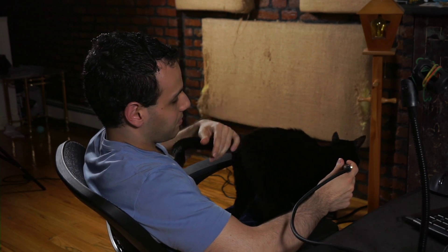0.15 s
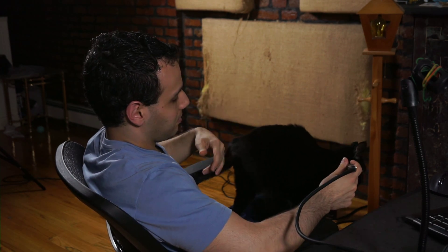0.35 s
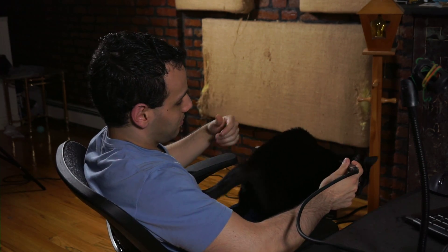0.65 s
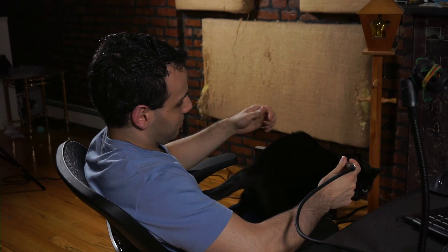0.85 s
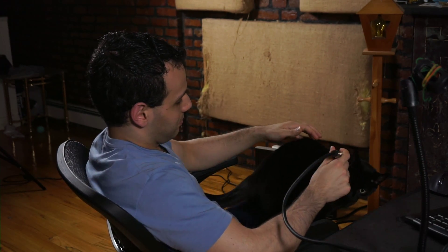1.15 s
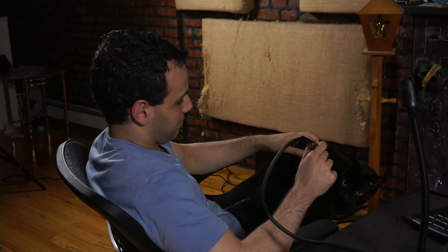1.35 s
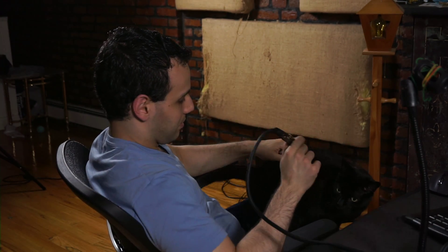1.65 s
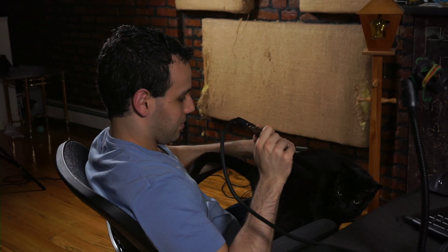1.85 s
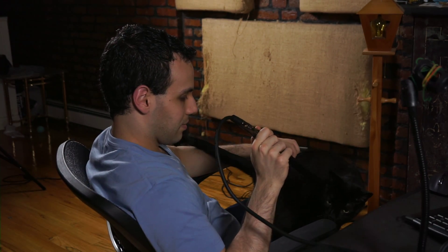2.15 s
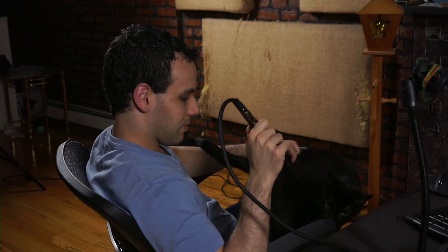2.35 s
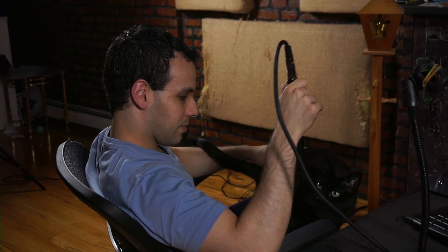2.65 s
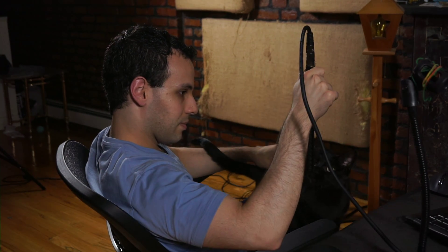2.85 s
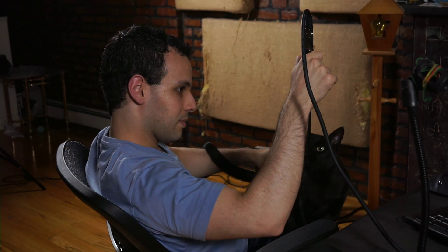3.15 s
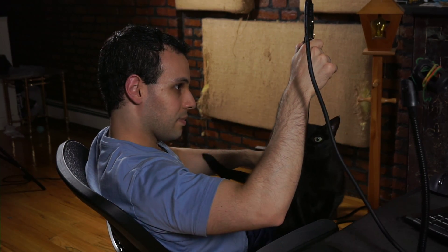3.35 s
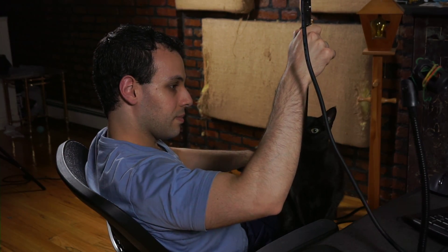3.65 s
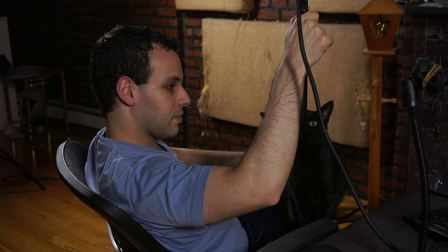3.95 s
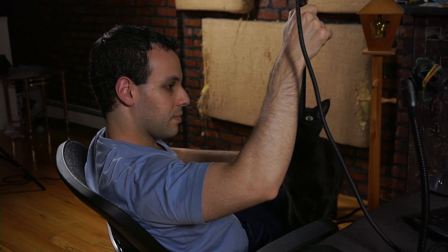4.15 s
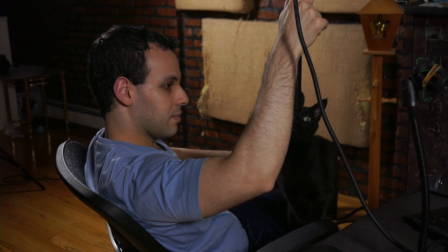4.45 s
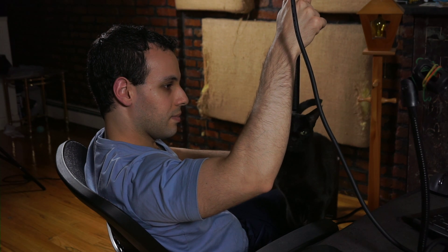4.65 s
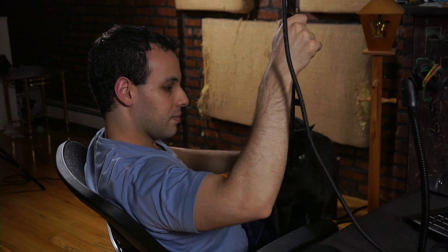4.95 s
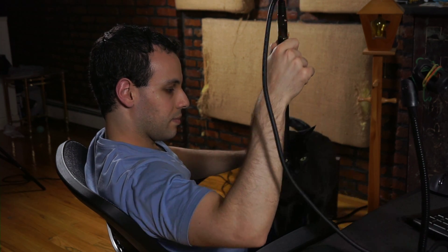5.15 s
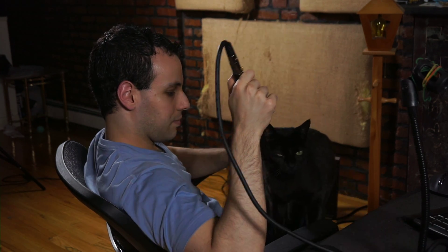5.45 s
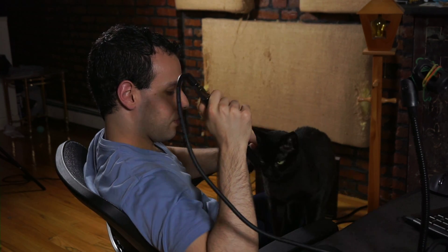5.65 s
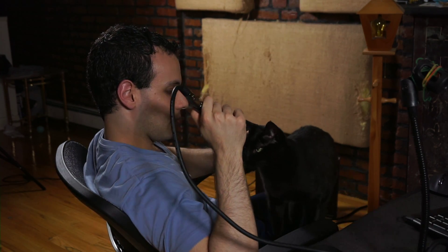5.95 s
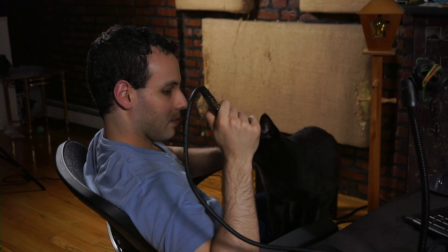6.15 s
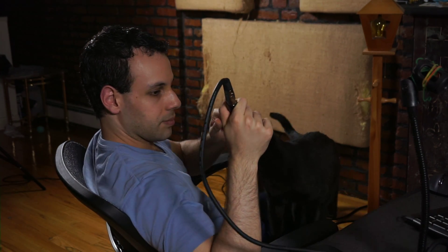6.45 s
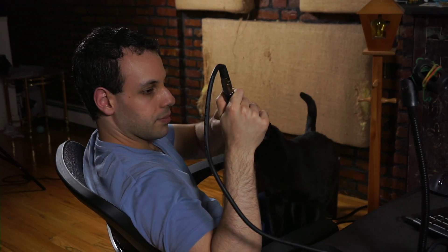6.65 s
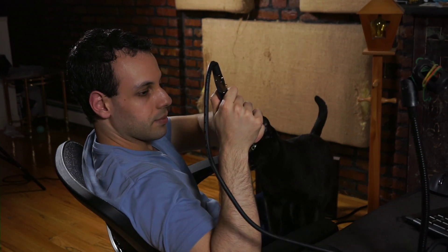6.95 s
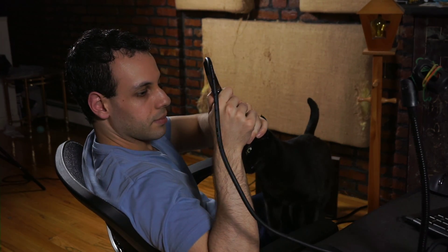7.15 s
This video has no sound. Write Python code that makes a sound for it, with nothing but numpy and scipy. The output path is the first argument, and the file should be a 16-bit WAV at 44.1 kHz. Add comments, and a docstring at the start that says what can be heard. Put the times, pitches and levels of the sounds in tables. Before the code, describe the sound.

Low, pulsing cat purring swells and fades right at the microphone, joined by soft knocks, fur rubs and brief wet squeaks.

```python
"""A cat purrs a few centimetres from a handheld microphone in a quiet room.
Its larynx is a pulse source, about 25 cycles a second, filtered by chest, throat and nose:
round on the way out, faster and with a rasp on the way in. Air forced through a tiny wet gap gives
three short kiss-like squeaks. Fur excites the grille by friction, and knocks rock the capsule;
behind it all lies the low rumble of the room."""
import sys
import numpy as np
from scipy import signal
from scipy.fft import rfft, irfft, next_fast_len
from scipy.io import wavfile

SR = 44100
rng = np.random.default_rng(int(sys.argv[2]) if len(sys.argv) > 2 else 0)


def store_pcm(level_fs):
    """Save levels as 16-bit WAV."""
    pcm = np.round(np.clip(level_fs, -1, 1) * 32767).astype(np.int16)
    wavfile.write(sys.argv[1], SR, np.atleast_2d(pcm).T)


N = 322004
TIME = np.arange(N) / SR
BAND_LIMIT_HZ = 15900

# Outward strokes: first pulse t/s, last pulse t/s, count, relative level/dB of throat, nose, reopening
EXHALES = [(1.96, 2.41, 12, -72, -66, 4.5), (2.750, 3.235, 13, -60.5, -58.5, 5.5),
           (3.500, 3.831, 9, -78, -71, -1.5), (4.213, 4.545, 9, -82, -87, -1),
           (5.012, 5.459, 12, -95, -94, -12), (5.805, 6.090, 8, -61, -67, 0),
           (6.545, 6.91, 10, -62, -84.5, 3)]
# Inward strokes: first pulse t/s, last pulse t/s, count, relative level/dB of throat, nose
INHALES = [(2.460, 2.691, 7, -56.5, -64), (3.249, 3.438, 6, -46.5, -73), (3.844, 4.150, 9, -49, -75),
           (4.560, 4.866, 9, -66.5, -66.5), (5.49, 5.755, 8, -58.5, -64.5), (6.125, 6.464, 10, -71, -70)]
THROAT, NOSE, REOPENING = 3, 4, 5  # level columns of the strokes
# Spectrum of the microphone housing, also given to the room's tail: f/Hz, level/dB
HOUSING = [(100, 3), (420, 10.5), (680, 2), (1100, 4), (2900, -2.5), (4800, -16.5), (12000, -36.5)]


def thumps():
    """Source and filter: the larynx shuts with a chest thump and reopens with a flap and a low gurgle."""
    nearness = [(1.9, -47.5), (2.5, -44.5), (2.9, -22), (3.4, -13.5), (3.62, -25.5), (4.3, -18.5),
                (4.55, -46), (5.15, -49), (5.98, -17), (6.2, -33.5), (6.5, -44), (6.9, -24)]  # gain as the head nears and turns away: t/s, level/dB
    chest_out = [(22, 7), (45, 3.5), (70, 11.5), (120, 5), (200, -10.5), (380, -20), (480, -30.5),
                 (620, -58.5)]  # chest spectrum, exhaling: f/Hz, level/dB
    chest_in = [(22, 5.5), (48, 2.5), (80, 10.5), (165, -19.5), (380, -24), (560, -55.5)]  # chest spectrum, inhaling: f/Hz, level/dB
    push = breath(EXHALES, start_db=-2.5, end_db=-9)
    pull = breath(INHALES, start_db=-3.5, end_db=1.6)
    shut_out = push * pulses(EXHALES, delay=-0.00616, jitter=0.0006, spread_db=1.6)
    shut_in = pull * pulses(INHALES, delay=-0.0036, jitter=0.00051, spread_db=1.5)
    open_out = push * pulses(EXHALES, delay=0.01076, jitter=0.0011, spread_db=1.5, column=REOPENING)
    open_in = pull * pulses(INHALES, delay=0.02, jitter=0.001, spread_db=3)
    outward = chest_wall(colour(shut_out, chest_out), hz=138) - amp(-14) * build_up(shut_out, 0.014)
    chest = outward + amp(-1.05) * colour(shut_in, chest_in)
    reopening = amp(-14) * open_in - amp(-20.5) * open_out
    flap = colour(reopening, [(60, -30.5), (140, 9.5), (260, -3.5), (480, -29.5)])
    turbulence = puffs(open_out + amp(-1) * shut_in, decay=0.0021)
    gurgle = amp(-20.5) * colour(turbulence, [(110, -3.5), (190, 0.5), (390, -3.5), (520, -20)])
    return curve(nearness) * (flap + gurgle - chest)


def rasp():
    """Pulsed turbulence: wet folds hiss, snap and tick inward, puff outward; the nose hisses in step."""
    throat_spectrum = [(170, -19.5), (440, 10.5), (600, -1), (820, -1), (1000, -5), (1450, -6),
                       (1800, -26.5), (3900, -27.5), (4700, -38.5), (6200, -22.5), (12000, -44.5)]  # throat resonances: f/Hz, level/dB
    nose_spectrum = [(400, -14), (1400, 11), (2600, -14.5), (3900, 2), (4900, -7.5), (6500, 0.5),
                     (8500, -8), (15000, -20.5)]  # nasal resonances: f/Hz, level/dB
    parting = pulses(INHALES, delay=0.0178, jitter=0.0007, spread_db=2.5, column=THROAT)
    snap = pulses(INHALES, delay=0.0203, jitter=0.0003, spread_db=1, column=THROAT)
    closing = pulses(INHALES, delay=-0.0045, jitter=0.001, spread_db=4.5, column=THROAT)
    leaving = pulses(EXHALES, delay=0.006, jitter=0.001, spread_db=2, column=THROAT)
    nose_out = pulses(EXHALES, delay=0.004, jitter=0.001, spread_db=2, column=NOSE)
    nose_in = pulses(INHALES, delay=0.011, jitter=0.001, spread_db=2, column=NOSE)
    inward = amp(5.5) * snap + parting + amp(-0.5) * puffs(parting, decay=0.00095)
    ticks = amp(-6) * closing + amp(-6.5) * puffs(closing, decay=0.00057)
    throat_air = amp(-7) * puffs(closing, decay=0.005) + amp(4.5) * puffs(leaving, decay=0.0048)
    throat = colour(inward + ticks + throat_air, throat_spectrum)
    ringing = amp(-21.5) * mode(snap + amp(-7.5) * closing, hz=3800, t60=0.013)
    nose_air = puffs(nose_out, decay=0.0065) + puffs(nose_in, decay=0.0031)
    return throat + ringing + colour(nose_air, nose_spectrum)


def wheeze():
    """Flow-driven whistle: on one inward stroke the nose gives rising peeps, highest at peak flow."""
    peep_run = (6.168, 6.432, 8, -47)  # nasal peeps: first t/s, last t/s, count, level/dB
    first, last, count, db = peep_run
    peep_s, base_hz = 0.014, 772
    flow_lift, peep_rise = 0.23, 0.46  # shares of the base pitch
    out, u = np.zeros(N), np.linspace(0, 1, int(peep_s * SR))
    for k, s in enumerate(np.linspace(first, last, round(count))):
        flow = np.sin(np.pi * (k + 0.5) / (count + 2))
        hz = base_hz * (1 + flow_lift * flow + peep_rise * (u - 0.5))
        peep = np.sin(np.pi * u) ** 2 * np.sin(2 * np.pi * np.cumsum(hz) / SR)
        add(out, s - peep_s / 2, amp(db + 2 * rng.standard_normal()) * flow ** 0.5 * peep)
    return out


def pulses(strokes, delay, jitter, spread_db, column=None):
    """Laryngeal pulse train with jitter and shimmer; a level column scales it and arches each stroke."""
    train = np.zeros(N)
    for stroke in strokes:
        first, last, count = stroke[0], stroke[1], round(stroke[2])
        unit_power = np.sqrt(SR * (last - first) / (count - 1))
        for k, s in enumerate(np.linspace(first, last, count)):
            late, size = rng.uniform(-1.38, 1, 2)
            arch = np.sin(np.pi * (k + 0.82) / count) ** 0.5
            flow = 1 if column is None else amp(stroke[column]) * arch
            add(train, s + delay + jitter * late, flow * amp([spread_db * size]) * unit_power)
    return train


def puffs(train, decay):
    """Modulated turbulence: each pulse lets through a soft-edged burst of noise."""
    u = np.arange(SR // 20) / SR / decay
    return excite(train, u ** 2 * np.exp(-u)) * rng.standard_normal(N)


def breath(strokes, start_db, end_db):
    """Amplitude envelope: each stroke gathers force, holds it and moves to end_db as the air turns."""
    gather_s, turn_s = 0.16, 0.1
    points = []
    for first, last, *_ in strokes:
        points += [(first, start_db), (first + gather_s, 0), (last - turn_s, 0), (last, end_db)]
    return curve(points)


def chest_wall(x, hz):
    """All-pass dispersion: the soft wall delays tones below hz, which rounds each thump."""
    pole = np.exp(-2 * np.pi * hz / SR)
    return signal.lfilter([-pole, 1], [1, -pole], x)


def build_up(train, length_s):
    """Blocked flow: pressure swells behind the closed larynx just before each thump."""
    swell = np.hanning(int(length_s * SR))
    lead = len(swell) * 3 // 4
    return signal.oaconvolve(train, swell / np.linalg.norm(swell))[lead:][:N]


def squeaks():
    """Self-oscillation of a tiny wet gap: fluttering harmonics sweep through fixed resonances."""
    # One path a squeak, low and loud while the gap is open, high and quiet when tight: t/s, f/Hz, level/dB
    paths = [
        [(5.565, 1236, -48.5), (5.571, 1056, -18.5), (5.577, 827, -13), (5.586, 756, -11), (5.603, 853, -16),
         (5.609, 1143, -16), (5.617, 1200, -23), (5.625, 1260, -50)],
        [(5.674, 1200, -44), (5.679, 1006, -12.5), (5.685, 830, -16.5), (5.692, 763, -12.5),
         (5.701, 818, -14.5), (5.709, 1095, -18.5), (5.717, 1270, -44)],
        [(5.775, 954, -48), (5.781, 885, -18), (5.789, 1040, -35), (5.796, 1065, -28), (5.801, 1060, -41)],
    ]
    # The gaps, the last slack, dull and rough: cutoff f/Hz, air noise level/dB, pitch waver (share)
    gaps = [(15000, -19.5, 0.015), (15130, -16, 0.018), (2730, -6.5, 0.037)]
    resonances = [(760, -1.5), (1600, -1.5), (2000, -4), (2320, 1), (2600, -8.5), (3900, -12.5),
                  (4600, -12), (6500, -26.5), (8500, -37.5), (15000, -37)]  # spectrum shaping each squeak: f/Hz, level/dB
    out, k = np.zeros(N), np.arange(1, 21)[:, None]  # harmonic numbers
    for path, (top_hz, air_db, waver) in zip(paths, gaps):
        s, pitch, db = np.transpose(path)
        t = np.arange(s.min(), s.max(), 1 / SR)
        hz = np.interp(t, s, pitch) * (1 + waver * wander(370)[:len(t)])
        flutter_db = 2.43 * np.resize(wander(61), (len(k), len(t))) * np.log(k)
        weight = amp(level_at(resonances, k * hz) + flutter_db) * (k * hz < BAND_LIMIT_HZ)
        phase = 2 * np.pi * k * np.cumsum(hz) / SR + rng.uniform(0, np.pi, k.shape)
        tone = (weight * np.cos(phase)).sum(0) / np.sqrt((weight ** 2).sum(0) / 2)
        air = colour(rng.standard_normal(len(t)), [(500, -24.5)] + resonances)
        squeak = amp(np.interp(t, s, db)) * (tone + amp(air_db) * air)
        add(out, t[0], low_pass(squeak, top_hz, order=2))
    return out


def bumps():
    """Impact excitation: a knock rocks the capsule for a cycle or two and clicks in the housing; the same shape
    gives the tick that ends an inward purr."""
    # Knocks on the microphone, and at 4.8838 s the tick that ends an inward purr stroke: t/s, thud level/dB,
    # thud f/Hz, click level/dB, click cutoff f/Hz
    knocks = [(0.7718, -12.5, 148, -13.5, 4500), (1.6232, -25.5, 126, -13.5, 3820),
              (4.8838, -36, 1260, -41, 2480), (5.7666, -2.5, 75, -48, 1000), (6.598, -23.5, 302, -37, 750),
              (6.979, -17, 112, -11, 1506), (7.164, -4, 71.4, -31, 910), (7.2283, -7.5, 87.5, -15.5, 1020),
              (7.286, -6, 75.7, -37, 1400)]
    out, t = np.zeros(N), np.arange(SR // 8) / SR
    housing = impulse_response(HOUSING)
    for s, thud_db, hz, click_db, top_hz in knocks:
        half_cycles = 2 * hz * t
        thud = (half_cycles * np.exp(1 - half_cycles)) ** 2 * np.sin(2 * np.pi * hz * t)
        click = low_pass(housing, top_hz, order=4)
        add(out, s, -amp(thud_db) * thud)
        add(out, s, -amp(click_db) * click / abs(click).max())
    return out


def fur():
    """Friction noise: fur pressing on the grille rumbles, and single hairs catch, scrape and fizz."""
    # Loose fur passing: middle t/s, half length t/s, rumble level/dB, hiss level/dB
    brushes = [(0.187, 0.16, -30.5, -62.5), (0.792, 0.14, -26, -52), (1.038, 0.045, -32.5, -57),
               (1.215, 0.06, -27.5, -60), (6.225, .1, -45, -60.5), (6.056, 0.049, -30, -53.5),
               (7.18, 0.06, -19.5, -59.5)]
    rubs = [(6.829, 0.319, 0.041, -42.5), (7.206, 0.12, 0.046, -36)]  # hard rubs: start t/s, length t/s, leaning-in t/s, scrape level/dB
    rumble = [(15, -11.5), (85, -2), (190, -11.5), (380, -19), (900, -36)]  # pressure spectrum: f/Hz, level/dB
    scrape = [(250, -14), (1000, 6), (2200, -2), (3500, -9.5), (4400, -3), (5050, -11.5), (5700, -9.5),
              (8000, -29)]  # midrange spectrum of the hairs: f/Hz, level/dB
    fizz = [(1500, -30), (4700, 8.5), (10000, 8), (15200, 7)]  # treble spectrum of the hairs: f/Hz, level/dB
    catches = rng.standard_normal(N) * (rng.random(N) < 45 / SR)  # about 45 a second
    sliding = rng.standard_normal(N) * amp(2 * wander(900) + 2.5 * wander(48))
    hairs = sliding + amp(16) * catches
    layers = np.array([noise(rumble), unit(colour(hairs, scrape)), unit(colour(hairs, fizz))])
    power = sum(brush(*row) ** 2 for row in brushes) + sum(rub(*row) ** 2 for row in rubs)
    return (np.sqrt(power) * layers).sum(0)


def brush(middle, half, rumble_db, hiss_db):
    """Grazing contact: one smooth swell in the gains of rumble, scrape and fizz."""
    return amp([[rumble_db], [hiss_db], [hiss_db]]) * np.exp(-abs((TIME - middle) / half) ** 1.35)


def rub(start, length, lean_s, db):
    """Friction grows with load: gains of rumble, scrape and fizz as the cat leans in and slips off."""
    attack_s, release_s, touch_db = 0.004, 0.032, -5
    t = np.maximum(TIME - start, 0)
    contact = np.clip(np.minimum(t / attack_s, (length - t) / release_s), 0, 1)
    lean = amp(touch_db * np.exp(-t / lean_s))
    return amp([[db + 13], [db], [db - 17.5]]) * contact * lean


def drags():
    """Friction-driven resonance: sliding fur sings on the grille in a drifting band of noise."""
    # Singing drags: start t/s, length t/s, level/dB, initial f/Hz, final f/Hz, bandwidth f/Hz
    slides = [(1.724, 0.053, -53, 2110, 2100, 220), (1.757, 0.21, -62, 2180, 2070, 260),
              (6.89, 0.18, -38, 1056, 1300, 1010), (7.031, 0.12, -44.5, 2100, 2300, 800)]
    out = np.zeros(N)
    for start, length, db, from_hz, to_hz, width_hz in slides:
        u = np.clip((TIME - start) / length, 0, 1)
        phase = 2 * np.pi * np.cumsum(from_hz + (to_hz - from_hz) * u) / SR
        band = wander(width_hz / 2) * np.cos(phase) + wander(width_hz / 2) * np.sin(phase)
        out += amp(db) * np.sqrt(2 * u * (1 - u)) * band
    return out


def hisses_and_ticks():
    """Noise transients: fur flicking the mesh, and one tick ending an inward purr."""
    bursts = [(1.715, 0.025, -50, 1750), (1.772, 0.00048, -46, 4400), (1.845, 0.016, -58, 7700),
              (1.957, 0.012, -55.5, 6170), (2.388, 0.016, -49.5, 1500), (4.885, 0.00077, -53, 1390),
              (6.7681, 0.0013, -30, 11400), (6.928, 0.0072, -51, 11500), (7.162, 0.004, -48.5, 8800)]  # brief hisses and ticks: start t/s, rise t/s, level/dB, centre f/Hz
    out, t = np.zeros(N), np.arange(SR // 2) / SR
    for s, rise, db, hz in bursts:
        hiss = t / rise * np.exp(1 - t / rise) * rng.standard_normal(len(t))
        add(out, s, amp(db) * colour(hiss, [(hz / 6, -22), (hz / 2, -4), (hz, 0), (hz * 1.3, -2)]))
    return out


def room(x, t60):
    """Reverberation: the reflections of a furnished room merge into exponentially decaying noise."""
    t = np.arange(SR // 2) / SR
    tail = rng.standard_normal(len(t)) * 1000 ** (-t / t60)
    return excite(x, colour(tail, HOUSING))


def room_rumble():
    """Stationary noise: the quiet room's background, strongest in the bass."""
    background = [(15, -0.5), (90, -1.5), (180, -11.5), (250, -10.5), (680, -28.5), (2300, -39),
                  (15000, -55)]  # spectrum of the room's noise: f/Hz, level/dB
    return amp(-42.5) * noise(background)


def mode(x, hz, t60):
    """Damped oscillator: x rings one resonance of energy 1."""
    t = np.arange(SR // 2) / SR
    return excite(x, 1000 ** (-t / t60) * np.sin(2 * np.pi * hz * t))


def excite(x, response):
    """Convolution with a response scaled to energy 1."""
    return signal.oaconvolve(x, response / np.linalg.norm(response))[:N]


def impulse_response(spectrum, size=8192):
    """Minimum-phase response, of energy 1, of a body with this spectrum (f/Hz, relative level/dB)."""
    hz = abs(np.fft.fftfreq(size, 1 / SR))
    roll_off = np.maximum(hz / spectrum[-1][0], 1) ** 3 * np.maximum(spectrum[0][0] / (hz + 1), 1)
    log_gain = np.log(amp(level_at(spectrum, hz)) / roll_off + 1e-6)
    response = np.fft.ifft(np.exp(np.conj(signal.hilbert(log_gain)))).real[:size // 2]
    return response / np.linalg.norm(response)


def colour(x, spectrum):
    """Linear filtering by a body with this spectrum."""
    return signal.oaconvolve(x, impulse_response(spectrum))[:len(x)]


def low_pass(x, hz, order):
    """Attenuation above a cutoff."""
    return signal.sosfilt(signal.butter(order, min(hz, BAND_LIMIT_HZ), fs=SR, output="sos"), x)


def noise(spectrum):
    """Filtered white noise of rms 1."""
    return unit(colour(rng.standard_normal(N), spectrum))


def wander(hz):
    """Random modulation of rms 1, with a bandwidth of about hz."""
    n = next_fast_len(N)
    smoothing = np.exp(-(np.fft.rfftfreq(n, 1 / SR) / hz) ** 2)
    return unit(irfft(rfft(rng.standard_normal(n)) * smoothing, n))[:N]


def level_at(spectrum, hz):
    """A spectrum's level/dB, interpolated over log frequency."""
    f, db = np.transpose(spectrum)
    return np.interp(np.log(hz + 1), np.log(f + 1), db)


def curve(points):
    """Gain envelope through points of t/s, level/dB."""
    return amp(np.interp(TIME, *np.transpose(points)))


def amp(db):
    """Decibels to amplitude ratio."""
    return 10 ** (np.asarray(db) / 20)


def unit(x):
    """Normalisation to rms 1."""
    return x / np.sqrt(np.mean(x ** 2) + 1e-20)


def add(mix, s, sound):
    """Superposes a sound at time s."""
    part = mix[max(round(s * SR), 0):][:len(sound)]
    part += sound[:len(part)]


def scene():
    """Superposition of all sources; squeaks and knocks ring on in the room and the grille."""
    sharp = squeaks() + bumps()
    tails = amp(-40) * room(sharp, t60=0.2) + amp(-43.5) * mode(sharp, hz=2000, t60=0.36)
    purr = thumps() + rasp() + wheeze()
    return (purr + sharp + fur() + drags() + hisses_and_ticks() + tails + room_rumble())[None]


def record(dry):
    """Band limiting: a linear-phase low-pass removes the highest treble."""
    taps = signal.firwin(511, BAND_LIMIT_HZ, window=("kaiser", 9), fs=SR)
    return signal.oaconvolve(dry, taps[None], "same")


dry = scene()
out = record(dry)
store_pcm(out)
```